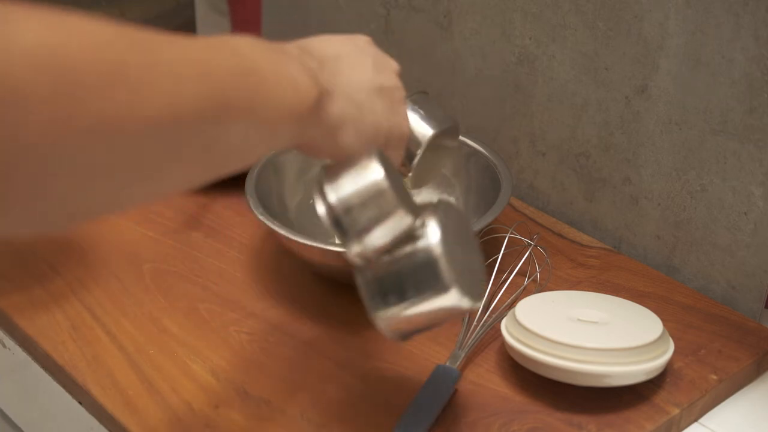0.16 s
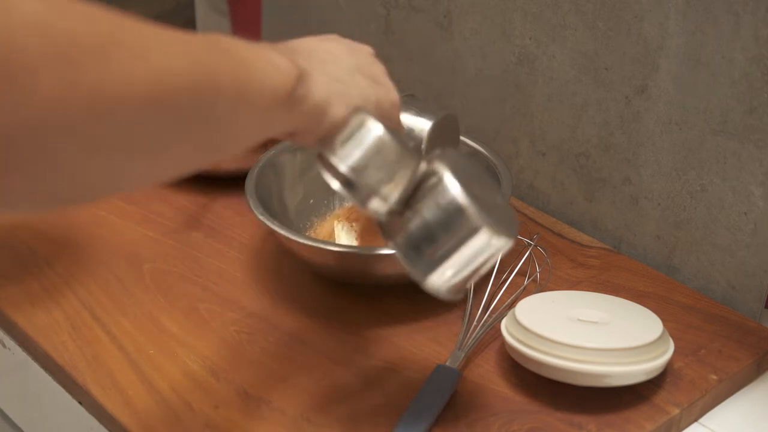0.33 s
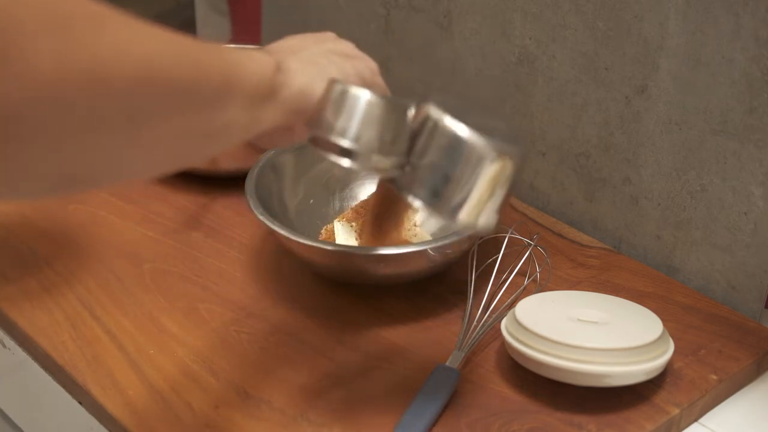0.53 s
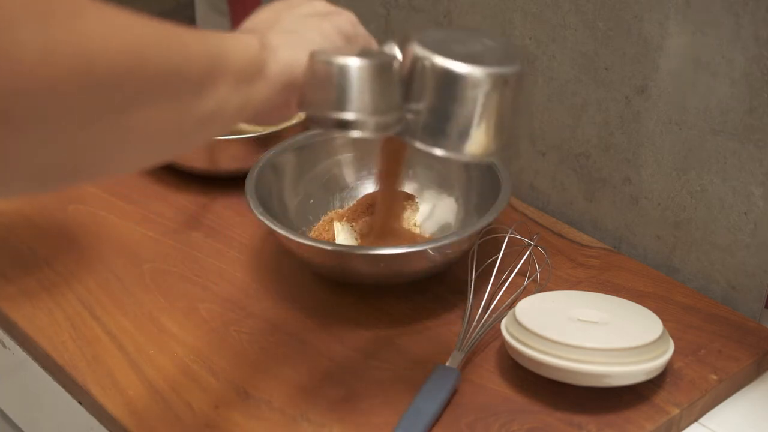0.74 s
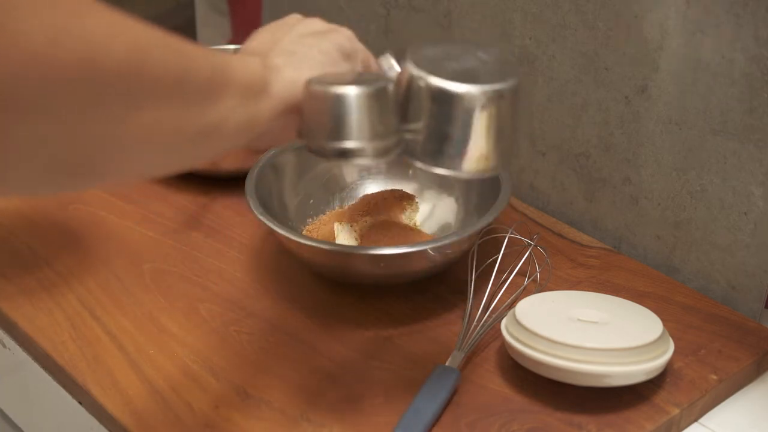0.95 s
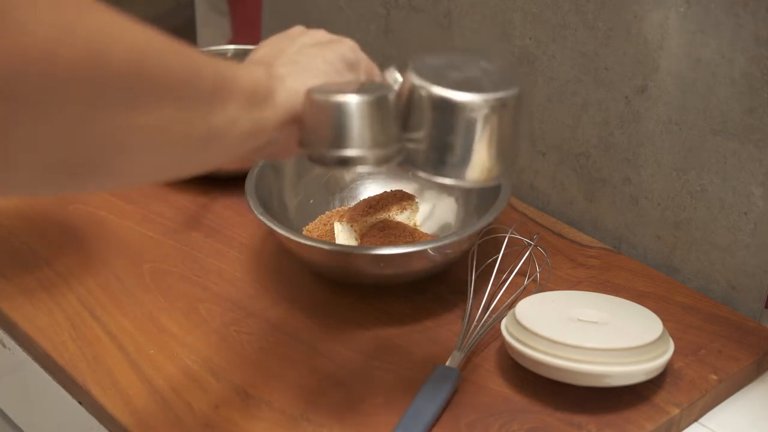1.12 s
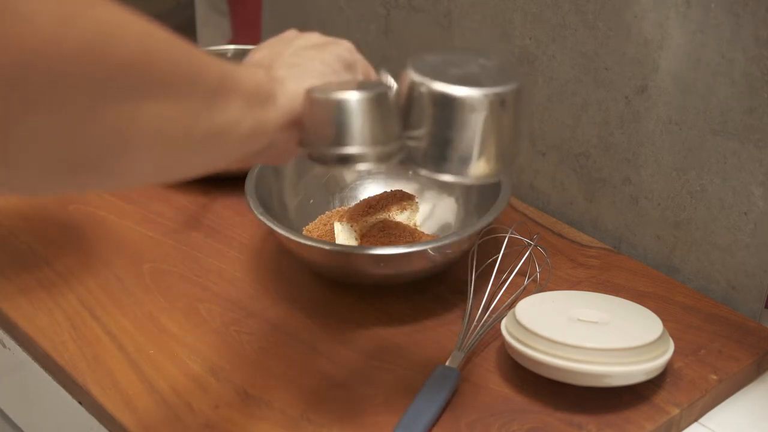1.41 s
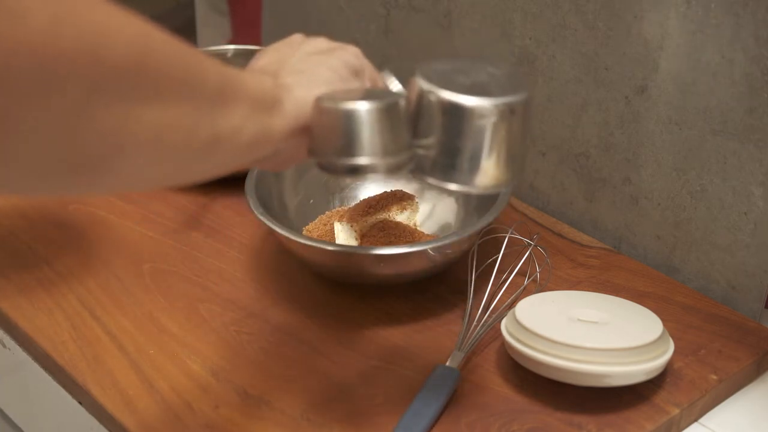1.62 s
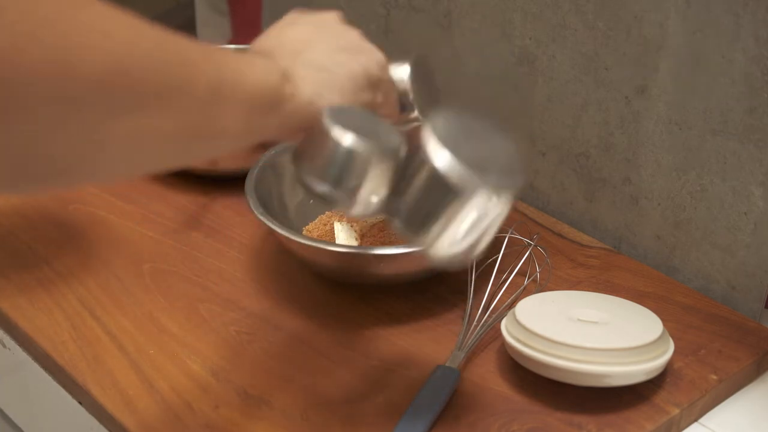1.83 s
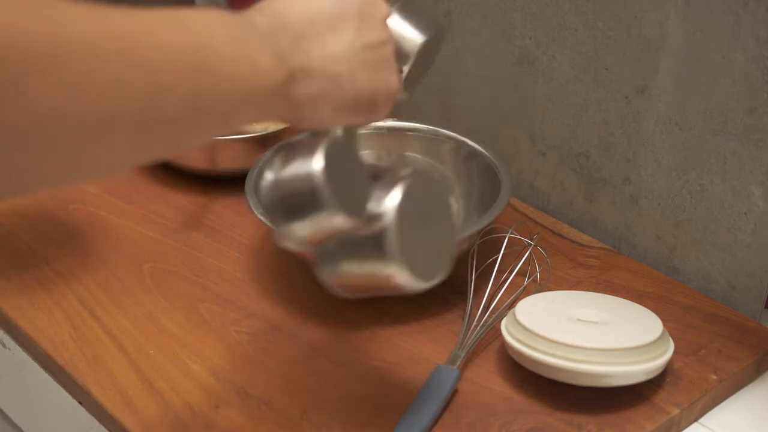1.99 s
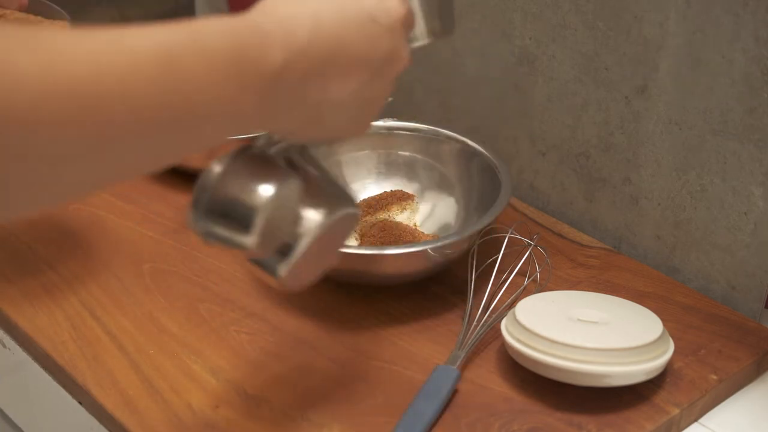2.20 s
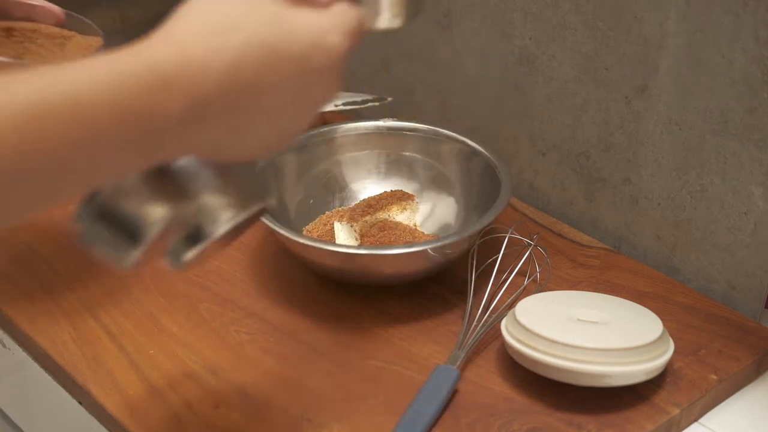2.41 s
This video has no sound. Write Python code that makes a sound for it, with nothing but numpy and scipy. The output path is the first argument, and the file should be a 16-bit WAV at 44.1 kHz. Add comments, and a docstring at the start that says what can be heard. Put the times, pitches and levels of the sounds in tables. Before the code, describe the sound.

Sugar rushes from a metal cup into a steel bowl in bright, hissing bursts with a thin ring, then cups clink twice and knock dully twice; close microphone, small kitchen, low appliance hum.

```python
"""Sugar poured into a steel bowl

Over a low appliance hum and room hiss, sugar slides from a steel cup and patters into a mixing bowl.
The sugar is thousands of tiny noise impacts that set the bowl's decaying sine tones ringing.
The nested cups clink twice and knock twice as they are shaken empty: sine tones, with noise cracks for clinks.
Two far, reverberant swishes and a faint rustle are shaped noise; a small kitchen echoes the near sounds."""
import sys
import numpy as np
from scipy import signal
from scipy.fft import rfft, irfft, next_fast_len
from scipy.io import wavfile
from scipy.ndimage import map_coordinates

SR = 44100
rng = np.random.default_rng(int(sys.argv[2]) if len(sys.argv) > 2 else 0)


def to_wav(sig):
    """Store sig (one row per channel, or 1-D mono) as 16-bit WAV at the path in sys.argv[1].

    Samples outside -1..1 are clipped; the rate is SR.
    """
    pcm = np.clip(np.atleast_2d(sig), -1, 1) * 32767
    pcm = np.round(pcm).astype(np.int16)
    wavfile.write(sys.argv[1], SR, pcm.T)  # frames by channels


N = 112454
TIME = np.arange(N) / SR  # seconds


def amp(db):
    """Turn decibels into a gain."""
    return 10 ** (np.asarray(db) / 20)


def unit(x):
    """Scale a sound to an rms of 1."""
    return x / np.sqrt(np.mean(x ** 2) + 1e-20)


def along(points, hz):
    """Read (frequency, value) points at any frequency, on a log axis."""
    f, v = np.transpose(points)
    return np.interp(np.log(hz + 1), np.log(f + 1), v)


def filtered(x, response):
    """Multiply the spectrum of x by a response that depends on frequency."""
    m = next_fast_len(len(x) + 8192)  # spare room so the end does not wrap onto the start
    hz = np.fft.rfftfreq(m, 1 / SR)
    return irfft(rfft(x, m) * response(hz), m)[:len(x)]


def coloured(x, spectrum):
    """Filter x by (frequency, dB) points, then scale it to an rms of 1."""
    return unit(filtered(x, lambda hz: amp(along(spectrum, hz))))


def fade(t, t60):
    """Exponential decay that drops 60 dB in t60 seconds."""
    return np.exp(-np.log(1000) * t / t60)


def since(start):
    """Seconds since start, zero before it."""
    return np.maximum(TIME - start, 0)


def dying(x, t60s, start):
    """From start on, each frequency of x dies away at its own speed."""
    hz, t, z = signal.stft(x, SR, nperseg=256)
    decay = fade(np.maximum(t - start, 0), along(t60s, hz)[:, None])
    return signal.istft(z * decay, SR)[1][:N]


def curve(rows):
    """Draw a (time, dB) curve sample by sample, at -100 dB outside its span."""
    return np.interp(TIME, *np.transpose(rows), left=-100, right=-100)


def wobble(rate):
    """A smooth random curve with rate random points a second."""
    points = rng.standard_normal(int(N * rate / SR) + 4)
    return map_coordinates(points, [TIME * rate])


# tone of the room hiss: (frequency [Hz], level [dB])
HISS_COLOUR = [(20, -24.5), (45, 0), (70, -8), (105, -4), (160, -2.5), (300, -9.5), (600, -17.5),
               (1200, -17), (2000, -19), (3300, -17.5), (5000, -21), (8000, -26.5), (10000, -32.5),
               (13500, -37.5), (16000, -41)]
# loudness of the room hiss: (time [s], level [dB])
HISS_LEVEL = [(0, -42.5), (1.4, -41), (1.7, -41), (1.8, -40), (2.55, -39.5)]
# hum tones, before the level curve and swell: (frequency [Hz], level [dB], pitch wander [Hz])
HUM_TONES = [(44.3, -57.5, 5.14), (103.7, -45, 6.23), (489.2, -59.5, 2.94)]
# slow level changes added to the hum: (time [s], level [dB])
HUM_LEVEL = [(0, -2.5), (.45, -0.5), (.8, 1), (1.9, 1.5), (2.3, 5.5), (2.55, 0.5)]
HUM_WANDER_PER_S, HUM_SWELL_DB = 16, 3  # random points a second; size of the random level changes


def background():
    """Filtered noise makes the hiss; sines of wavering pitch and level make the appliance hum."""
    hiss = coloured(rng.standard_normal(N), HISS_COLOUR)
    hum = np.zeros(N)
    for hz, db, wander in HUM_TONES:
        pitch = hz + wander * wobble(HUM_WANDER_PER_S)
        turns = np.cumsum(pitch) / SR
        level = amp(db + HUM_SWELL_DB * wobble(HUM_WANDER_PER_S))
        hum += level * np.sqrt(2) * np.sin(2 * np.pi * turns)
    hiss_gain = amp(np.interp(TIME, *np.transpose(HISS_LEVEL)))
    hum_gain = amp(np.interp(TIME, *np.transpose(HUM_LEVEL)))
    return hiss_gain * hiss + hum_gain * hum


GRAINS_PER_S, GRAIN_SPREAD_DB = 9000, 0.5  # rate at a level of -30 dB; scatter of grain strength
CROWDING = 0.65  # dB of rate per dB of level


def grains(level_db, colour):
    """Tiny random impacts: a stronger flow is denser as well as louder."""
    chance = GRAINS_PER_S / SR * amp(CROWDING * (level_db + 30))
    chance = np.clip(chance, 1e-3, 1)  # of a hit at each sample
    struck = rng.random(N) < chance
    strength = rng.standard_normal(N) * amp(GRAIN_SPREAD_DB * rng.standard_normal(N))
    even = struck * strength / np.sqrt(chance)  # same average power however dense the hits
    return amp(level_db) * coloured(even, colour)


# sugar striking the bare steel: (time [s], level [dB])
ON_STEEL = [(.2, -62), (.214, -33.5), (.227, -40), (.24, -26), (.262, -30), (.288, -33.5), (.325, -26),
            (.345, -23), (.365, -22), (.42, -34), (.536, -40.5), (.616, -37.5), (.645, -31), (.68, -36),
            (.745, -49), (.85, -66)]
# tone of grains on steel: (frequency [Hz], level [dB])
STEEL_COLOUR = [(300, -44), (900, -29), (1500, -16), (2000, -16), (2450, -18), (2850, -1.5), (3150, 2.5),
                (3450, -20), (4100, -17), (4500, -1.5), (4850, 0.5), (5400, -10.5), (6900, -6.5),
                (7400, -8), (10000, -6), (11800, -8), (14000, -5.5), (16000, -12.5)]
# sugar sliding off the cup onto the heap: (time [s], level [dB])
ON_HEAP = [(.2, -75), (.235, -41), (.29, -37.5), (.35, -19.5), (.42, -33), (.53, -41), (.615, -40.5),
           (.64, -30.5), (.675, -28), (.7, -29.5), (.745, -39), (.8, -43.5), (.865, -51), (.89, -41),
           (.925, -31.5), (.97, -48), (1.05, -77)]
# tone of grains on the heap: (frequency [Hz], level [dB])
HEAP_COLOUR = [(500, -34), (2000, -22), (2800, -12.5), (3600, -9.5), (4400, -6.5), (5400, -9), (6900, -9.5),
               (7300, 1), (10200, -2), (11700, -9), (14000, -5.5), (16000, -21)]
# clumps that drop at once: (time [s], level [dB])
CLUMPS = [(0.34, -19), (0.664, -20), (0.917, -26.5)]
CLUMP_T60_S = 0.06
# the bowl's lowest band, smothered as sugar covers the steel: (time [s], level [dB])
BARE_BOWL = [(.2, -61), (.214, -38), (.227, -48), (.243, -34), (.28, -43.5), (.32, -38), (.37, -41),
             (.43, -50), (.52, -64)]
# tone of that lowest band: (frequency [Hz], level [dB])
BARE_COLOUR = [(600, -32), (1200, -24), (1420, -4), (1580, 0), (1900, -4.5), (2500, -8.5), (4000, -19)]
# ringing tones of the bowl, levels against each other: (frequency [Hz], level [dB], 60 dB decay [s])
BOWL_TONES = [(1545, -6, .08), (2900, -5, .06), (3030, -2, .08), (3165, 2, .45), (4470, -6, .08),
              (4665, 1, .12), (4789, -1, .35), (5175, -5, .35), (6380, -9, .15), (6990, -7, .35),
              (7320, -6, .15), (7485, -3, .3), (8160, -6, .35), (8605, -6, .2), (9813, -6, .3),
              (11745, -7, .4), (12924, -10, .3), (14472, -10, .3)]
BOWL_DB = -9.5  # all the ringing together, against the patter


def sugar():
    """Crystals patter on steel and on the heap, and each impact sets the bowl ringing."""
    clumps = sum(amp(db) * fade(since(s), CLUMP_T60_S) * (TIME > s) for s, db in CLUMPS)
    heap_db = 20 * np.log10(np.hypot(amp(curve(ON_HEAP)), clumps))
    patter = grains(curve(ON_STEEL), STEEL_COLOUR)
    patter += grains(heap_db, HEAP_COLOUR)
    patter += grains(curve(BARE_BOWL), BARE_COLOUR)
    ring = np.zeros(N)
    for hz, db, t60 in BOWL_TONES:
        tone = np.sin(2 * np.pi * hz * TIME) * fade(TIME, t60)
        ring += amp(db) * unit(signal.fftconvolve(patter, tone)[:N])
    return patter + amp(BOWL_DB) * patter.std() * unit(ring)


# far swishes: (peak time [s], level [dB], rise [s], hold [s], bass level [dB])
SWISHES = [(0.991, -27, 0.042, 0.029, -4.5), (2.11, -26.5, 0.059, .008, -19)]
# main tone of the swishes: (frequency [Hz], level [dB])
SWISH_COLOUR = [(120, -24), (200, -1.5), (340, -8.5), (472, -1.5), (577, -12), (719, -2), (774, -6),
                (832, -4.5), (3800, -2.5), (7740, -10.5), (15800, -26)]
# tone of their bass part: (frequency [Hz], level [dB])
SWISH_BASS = [(60, -3.5), (150, -2), (400, -2.5), (700, -9.5), (1200, -1.5), (2500, -30)]
# how long they linger in the room: (frequency [Hz], 60 dB decay [s])
SWISH_T60 = [(200, 0.65), (1000, 0.97), (3500, 1), (8000, 0.96), (14000, .6)]


def swishes():
    """Broad rushes of noise that swell, hold briefly and die away in the room."""
    out = np.zeros(N)
    for peak, db, rise, hold, bass_db in SWISHES:
        rush = coloured(rng.standard_normal(N), SWISH_COLOUR)
        rush += amp(bass_db) * coloured(rng.standard_normal(N), SWISH_BASS)
        swell = np.exp(2 * np.minimum(TIME - peak, 0) / rise)
        out += amp(db) * swell * dying(rush, SWISH_T60, peak + hold)
    return out


# cup against cup, the last two forming one clink, levels before halving:
# (time [s], level [dB], treble tilt [dB per octave])
CLINKS = [(1.5117, -18.5, 0.5), (1.6359, -22, 0.5), (1.6401, -22.5, -2)]
# ringing tones of the cups, before the tilt: (frequency [Hz], level [dB], 60 dB decay [s])
CUP_TONES = [(1160, -15, .08), (1500, -8, .055), (1640, -6, .06), (1750, -22, .45), (1910, -22, .65),
             (2304, -13, .16), (2610, -6, .075), (3445, -17, .15), (4759, -14, .08), (5620, -9, .05),
             (5840, 1, .06), (6060, -3, .055), (6430, -17, .2), (6810, -13, .08), (7700, -4, .045),
             (8245, -6, .05), (11550, -17, .07), (13930, -21, .11)]
# tone of the crack, before the tilt: (frequency [Hz], level [dB])
CLINK_CRACK = [(500, -20), (1050, -5), (1600, 8.5), (3000, -12), (5000, 0), (6000, 2.5), (7000, -9),
               (8400, -6.5), (10000, -13), (14000, -18), (16000, -17)]
CRACK_DB, CRACK_T60_S = 0.5, 0.047
CLINK_ATTACK_S = 0.00023


def clinks():
    """Each contact cracks and rings the hand-damped cups; its treble tilt sets the brightness."""
    out = np.zeros(N)
    for start, db, tilt_db in CLINKS:
        t = since(start)
        tilt = lambda hz: tilt_db * np.log2(hz / 4000)  # no change at 4000 Hz
        ring = np.zeros(N)
        for hz, level, t60 in CUP_TONES:
            tone = np.sin(2 * np.pi * (hz * t + rng.random()))  # random starting phase
            ring += amp(level + tilt(hz)) * tone * fade(t, t60)
        crack_colour = [(hz, level + tilt(hz)) for hz, level in CLINK_CRACK]
        crack = coloured(rng.standard_normal(N), crack_colour) * fade(t, CRACK_T60_S)
        attack = 1 - np.exp(-t / CLINK_ATTACK_S)
        out += amp(db) * (ring + amp(CRACK_DB) * crack) * attack / 2
    return out


# a faint high rustle while the arm draws back: (time [s], level [dB])
RUSTLE = [(1.72, -70), (1.79, -45.5), (1.88, -55.5), (2.05, -57), (2.36, -52), (2.43, -44.5), (2.5, -55),
          (2.56, -62)]
# tone of the rustle: (frequency [Hz], level [dB])
RUSTLE_COLOUR = [(600, -18), (2000, 1), (4000, 4), (8000, 0), (11000, -10), (14000, -9), (16000, -18)]


def rustle():
    """Thin, lightly grained rubbing noise, made of tiny impacts."""
    return grains(curve(RUSTLE), RUSTLE_COLOUR)


# dull knocks of the handles: (time [s], level [dB], factor on the tones' decay times)
KNOCKS = [(1.795, -6.5, 0.89), (1.9796, -9, 0.72)]
# ringing tones of the handles, before that factor: (frequency [Hz], level [dB], 60 dB decay [s])
HANDLE_TONES = [(1432, 0.5, 0.025), (1530, -14, 0.054), (1756, -30, 0.18), (1875, -37, 0.56),
                (3800, -25.5, 0.057)]
KNOCK_ATTACK_S = 0.0025


def knocks():
    """Soft contacts sound mainly one low, quickly damped tone."""
    out = np.zeros(N)
    for start, db, length in KNOCKS:
        t = since(start)
        ring = np.zeros(N)
        for hz, level, t60 in HANDLE_TONES:
            ring += amp(level) * np.sin(2 * np.pi * hz * t) * fade(t, length * t60)
        attack = 1 - np.exp(-(t / KNOCK_ATTACK_S) ** 2)
        out += amp(db) * ring * attack
    return out


# how long the kitchen echoes: (frequency [Hz], 60 dB decay [s])
ROOM_T60 = [(200, 0.37), (1700, 0.88), (6000, 0.49), (14000, 0.4)]
WALL_DB = -18.5  # early copies, before their random strengths


def kitchen(x, wet_db):
    """Add early copies from the counter and wall, and a short diffuse tail of fading noise."""
    build_up = 1 - np.exp(-TIME / 0.0027)
    tail = dying(rng.standard_normal(N), ROOM_T60, 0) * build_up
    answer = amp(wet_db) * tail / np.linalg.norm(tail)
    delays = rng.uniform(0.003, 0.016, size=6)  # seconds
    answer[(delays * SR).astype(int)] += amp(WALL_DB) * rng.uniform(-1.1, 1, size=6)
    return x + signal.fftconvolve(x, answer)[:N]


def scene():
    """Mix all the sounds and send them to both channels alike."""
    near = kitchen(sugar() + rustle(), wet_db=-14.5)
    near += kitchen(clinks(), wet_db=-13.5)
    near += kitchen(knocks(), wet_db=-12)
    mono = near + swishes() + background()
    return np.array([mono, mono])


TOP_HZ = 15800


def record(dry):
    """The camera keeps nothing at or above its band limit."""
    return np.array([filtered(channel, lambda hz: hz < TOP_HZ) for channel in dry])


dry = scene()
out = record(dry)
to_wav(out)
```